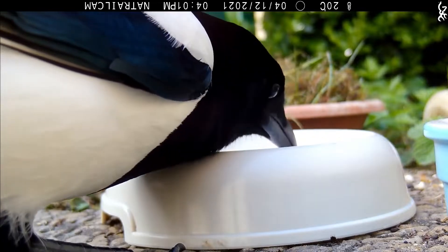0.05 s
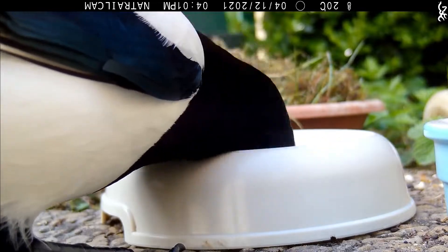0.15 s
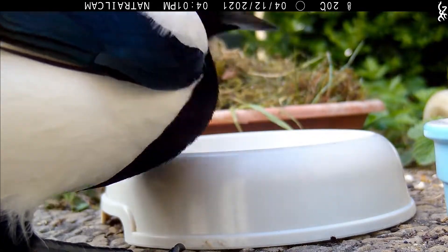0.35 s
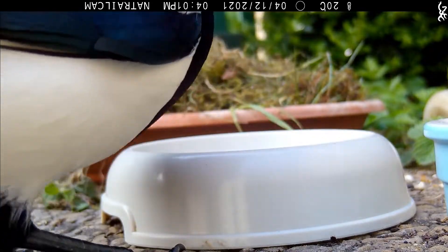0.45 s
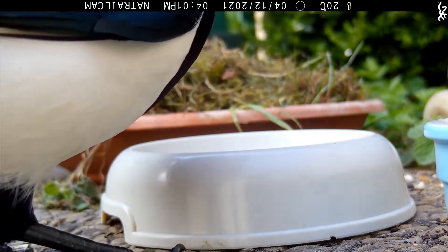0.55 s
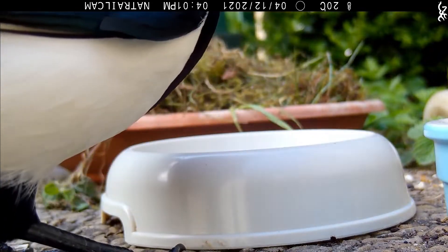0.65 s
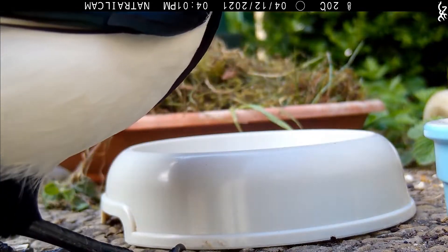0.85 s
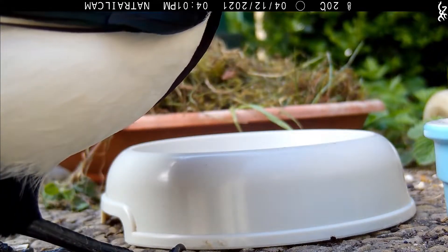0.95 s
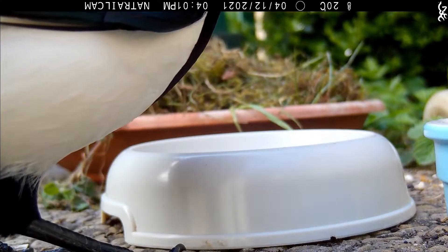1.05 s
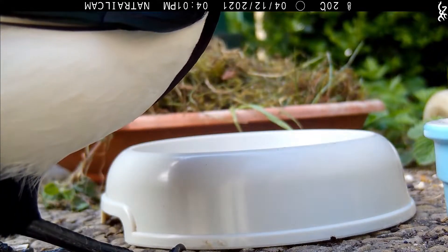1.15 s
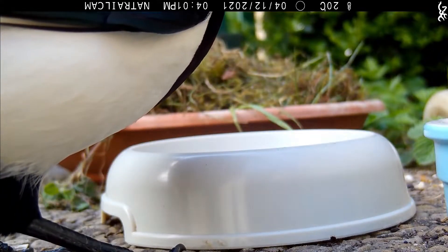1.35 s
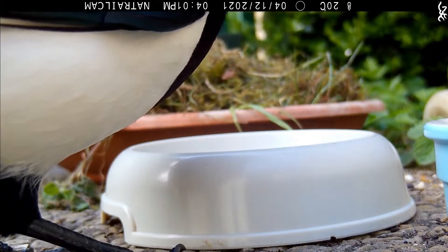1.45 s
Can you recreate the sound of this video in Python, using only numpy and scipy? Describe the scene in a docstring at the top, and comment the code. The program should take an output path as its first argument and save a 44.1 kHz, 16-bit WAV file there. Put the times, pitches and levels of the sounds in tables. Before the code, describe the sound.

A bird's beak pecks a plastic bowl lightly, then gives it one sharp tap.

```python
"""A garden, with a small camera microphone close to a plastic bowl that a magpie pecks at.
Two light, rattling pecks knock the bowl; then one sharp tap rings near 3.4 kHz and overloads the
input, which thuds and spits. Ground and plants throw a little of the tap back. The beak ticks
faintly over a steady outdoor hush, a faint hum and a thin whine of the electronics."""
import sys
import numpy as np
from scipy import signal
from scipy.fft import rfft, irfft
from scipy.io import wavfile

SR = 44100
rng = np.random.default_rng(int(sys.argv[2]) if len(sys.argv) > 2 else 0)


def wav_out(sig):
    """Save sig, one row per channel (or a flat mono array), as 16-bit PCM at SR to the path in sys.argv[1]."""
    wavfile.write(sys.argv[1], SR, np.round(np.clip(np.atleast_2d(sig).T, -1, 1) * 32767).astype(np.int16))


N = 66150


def undb(db):
    """Decibels to gain."""
    return 10 ** (np.asarray(db) / 20)


def since(start):
    """Seconds since a moment, zero before it."""
    return np.maximum(np.arange(N) / SR - start, 0)


def swell(start, rise_s):
    """Envelope that builds up from a moment and stays."""
    return 1 - np.exp(-since(start) / rise_s)


def burst(start, decay_s):
    """Envelope that jumps up and dies away."""
    t = since(start)
    return (t > 0) * np.exp(-t / decay_s)


def noise(gain):
    """Noise of rms 1 whose spectrum follows gain(Hz)."""
    hz = np.linspace(1, SR / 2, N // 2 + 1)
    shaped = irfft(rfft(rng.standard_normal(N)) * gain(hz), N)
    return shaped / shaped.std()


def coloured(points):
    """Noise of rms 1 with a colour given as (frequency [Hz], relative level [dB]) points."""
    hz, db = np.array(points).T
    return noise(lambda f: undb(np.interp(np.log(f), np.log(hz), db)))


def band(hz, width_hz):
    """Noise of rms 1 in one resonance."""
    return noise(lambda f: 1 / (1 + (2 * (f - hz) / width_hz) ** 2))


def ring(start, modes):
    """Decaying partials (frequency [Hz], t60 [s], level [dB]) that start together."""
    t = since(start)
    partials = (undb(db) * np.cos(2 * np.pi * hz * t) * 1000 ** (-t / t60) for hz, t60, db in modes)
    return (t > 0) * sum(partials)


# Garden air at the microphone (frequency [Hz], relative level [dB])
HUSH_COLOUR = [(25, -22.5), (70, -13.5), (108, -4), (145, -9.5), (210, -5), (275, -6), (330, -2.5),
               (450, -2.5), (900, -2), (1600, -5.5), (2600, -11.5), (3600, -20.5), (5000, -31.5),
               (6400, -41), (8500, -42.5), (15500, -41)]
def background():
    """The bed: steady outdoor hush, a faint wavering hum and a thin electronic whine."""
    hush = undb(-59) * coloured(HUSH_COLOUR)
    hum = undb(-77.5) * band(274, width_hz=12)
    whine = undb(-92) * np.sin(2 * np.pi * 7806 * since(0))
    return hush + hum + whine


# The bowl's modes from close by, also rung by the tap
# (frequency [Hz], t60 [s], relative level when pecked [dB], relative level when tapped [dB])
BOWL_MODES = [(272, .5, -56, -60), (763, .02, -60, -60), (1035, .03, -35, -60), (1751, 0.044, -38, -60.5),
              (2157, .022, -61, -23.5), (2266, .035, -42, -61), (2468, .033, -43, -38.5),
              (2763, .028, -56, -16), (3010, 0.01198, -57, -13), (3191, 0.029, -56, -12.5),
              (3403, .049, -58.5, -12), (3442, 0.034, -62.5, -14), (3593, 0.016, -59, -13.5),
              (4100, .03, -50, -60), (4140, 0.012, -52, -13), (4470, .025, -50, -60),
              (4760, .015, -75, -12.5), (5000, .02, -54, -60)]
# Beak scraping on plastic (frequency [Hz], relative level [dB])
SCRAPE_COLOUR = [(200, -18), (700, 18.5), (2400, 18), (3300, 0), (4500, 2), (6500, -18), (15000, -30)]
# Light pecks and their rebounds (time [s], relative level [dB])
PECK_HITS = [(.1656, 0), (.1700, -12), (.1747, -3.5), (0.178, -10), (.1797, -14)]
def pecks():
    """Each light, soft contact rings the bowl and scrapes briefly, with no weight in the bass."""
    modes = [(hz, t60, db) for hz, t60, db, _ in BOWL_MODES]
    scrape = undb(-33.5) * coloured(SCRAPE_COLOUR)
    rattle = np.zeros(N)
    for start, db in PECK_HITS:
        bowl = swell(start, rise_s=.00028) * ring(start, modes)
        rattle += undb(db) * (bowl + scrape * burst(start, decay_s=.0027))
    low_cut = signal.butter(2, 513.9, "highpass", fs=SR, output="sos")
    return signal.sosfilt(low_cut, rattle)


# Faint beak ticks near the microphone (time [s], centre [Hz], relative level [dB])
BEAK_TICKS = [(.1930, 5500, -59), (.2120, 5700, -58), (0.3812, 5000, -60), (.529, 4950, -66)]
def ticks():
    """The beak makes tiny dry clicks, each a short burst of high noise."""
    return sum(undb(db) * band(hz, width_hz=1800) * burst(start, decay_s=.0016)
               for start, hz, db in BEAK_TICKS)


TAP_S = .2297
def overload_gate(length_s):
    """Gate that is open while the sharp tap overloads the input."""
    t = since(TAP_S)
    return (t > 0) * np.exp(-(t / length_s) ** 8)


# Dull thud of the input overloading in the tap's first 3 ms
# (frequency [Hz], t60 [s], relative level [dB])
OVERLOAD_THUD = [(188, 0.0065, -18), (827, .009, -16.5), (1236.6, .009, -13.5), (1860, .02, -19),
                 (3920, 0.0087, -14), (5570, 0.0079, -10.5)]
def tap():
    """The hard blow: the bowl's bright ring swells and beats, and the overloaded input thuds briefly."""
    modes = [(hz, t60, db) for hz, t60, _, db in BOWL_MODES]
    bowl = swell(TAP_S, rise_s=.00094) * ring(TAP_S, modes)
    thud = overload_gate(length_s=.0024) * ring(TAP_S, OVERLOAD_THUD)
    return undb(2.5) * (bowl + thud)


# Clipping distortion that leaks past the input's low-pass (frequency [Hz], relative level [dB])
SPIT_COLOUR = [(30, -10), (200, -10), (5000, -11.5), (6500, 1.5), (7800, 3.5), (10000, -4.5), (12500, 1),
               (14500, 5), (16500, 1.5)]
def overload_spit():
    """A brief treble spit of distortion as the loud tap overloads the input."""
    return undb(-36.5) * overload_gate(length_s=.0022) * coloured(SPIT_COLOUR)


# Reflections from the garden around the bowl (frequency [Hz], relative level [dB])
SCATTER_COLOUR = [(300, -20.5), (2000, -5), (3300, 0), (5500, -13), (8000, -34), (15000, -45)]
def scatter():
    """Ground and plants throw back a faint, quick wash of the hard blow."""
    return undb(-48.5) * coloured(SCATTER_COLOUR) * burst(TAP_S, decay_s=.011)


def microphone(sound, ceiling=.34, treble_hz=5820):
    """The camera's input flattens the loudest peaks and passes little of the high treble."""
    overloaded = ceiling * np.tanh(sound / ceiling)
    return signal.sosfilt(signal.butter(12, treble_hz, fs=SR, output="sos"), overloaded)


def scene():
    """Beak and bowl through the close microphone, plus overload spit, scatter and background, in mono."""
    bird = microphone(pecks() + tap() + ticks())
    return (bird + overload_spit() + scatter() + background())[None]


def record(dry):
    """The recorder cuts the top steeply above 16.1 kHz."""
    return signal.sosfilt(signal.butter(24, 16100, fs=SR, output="sos"), dry)


dry = scene()
out = record(dry)
wav_out(out)
```